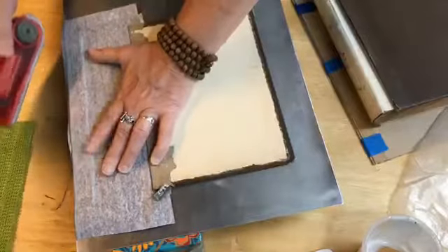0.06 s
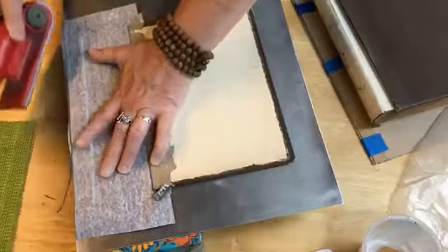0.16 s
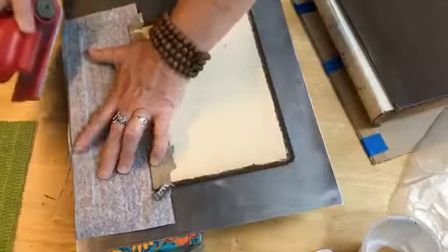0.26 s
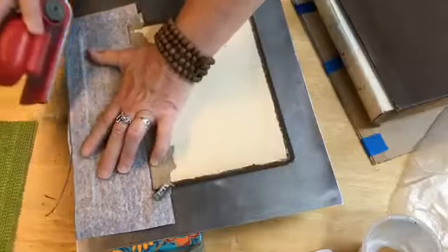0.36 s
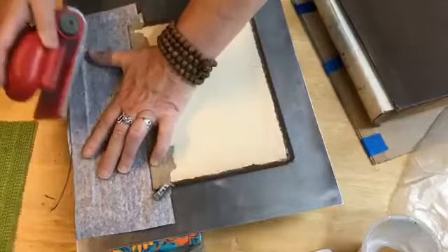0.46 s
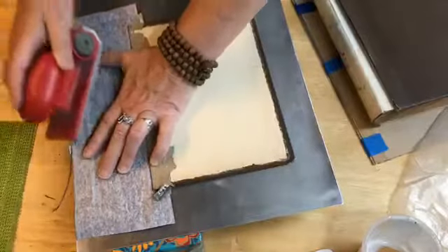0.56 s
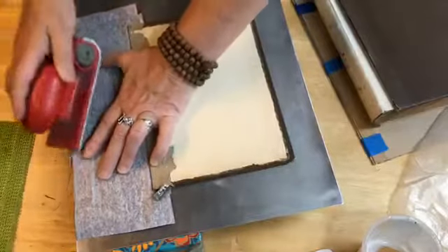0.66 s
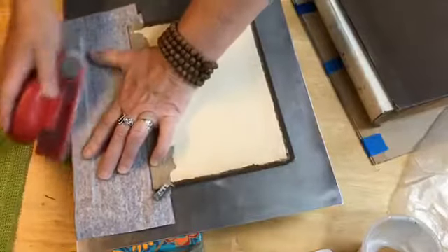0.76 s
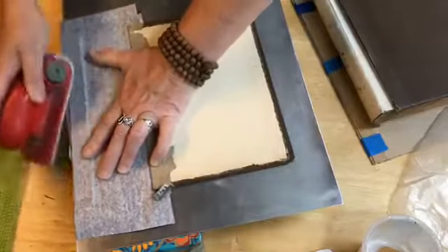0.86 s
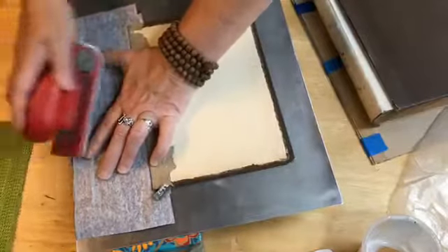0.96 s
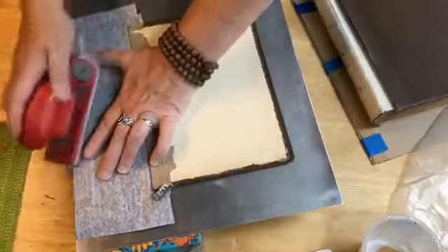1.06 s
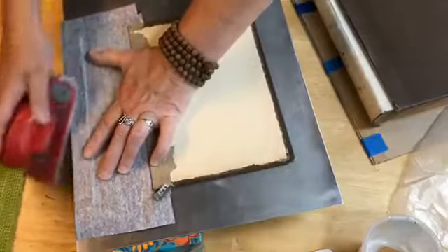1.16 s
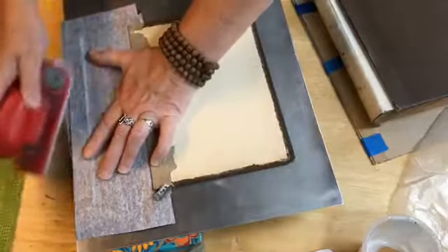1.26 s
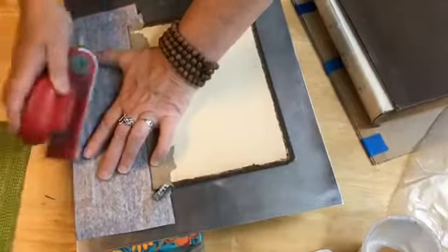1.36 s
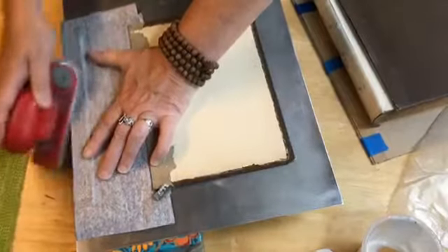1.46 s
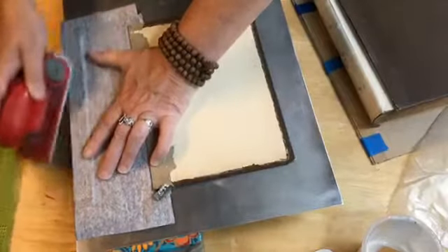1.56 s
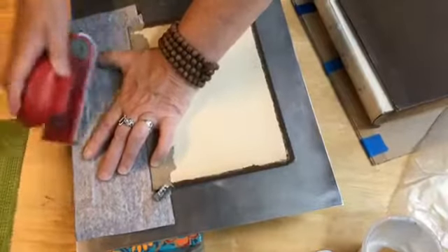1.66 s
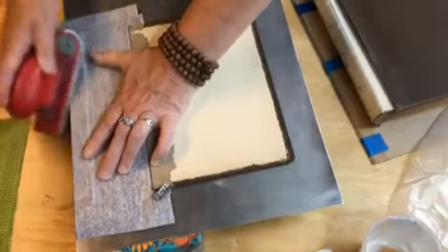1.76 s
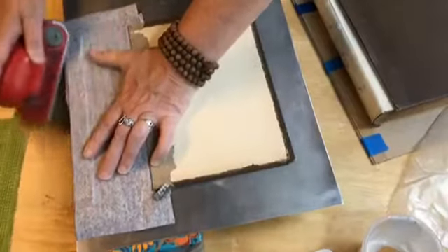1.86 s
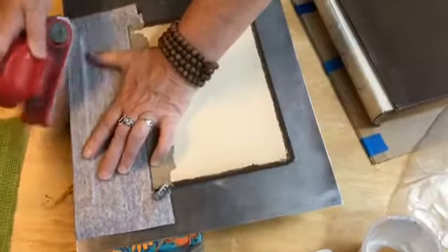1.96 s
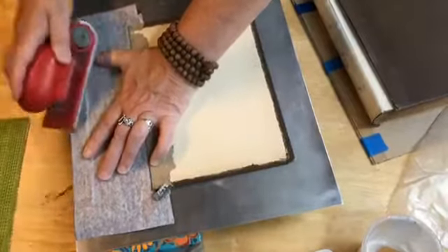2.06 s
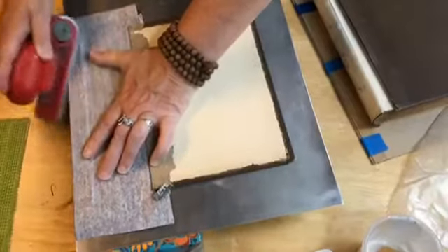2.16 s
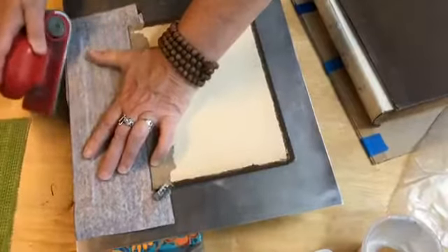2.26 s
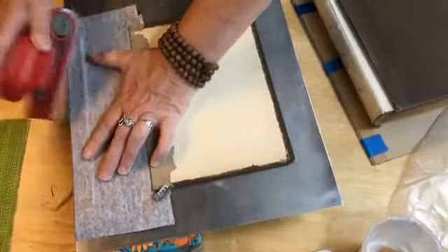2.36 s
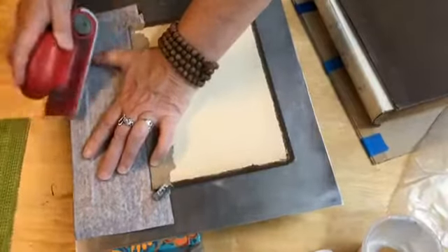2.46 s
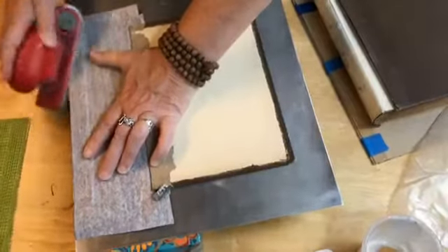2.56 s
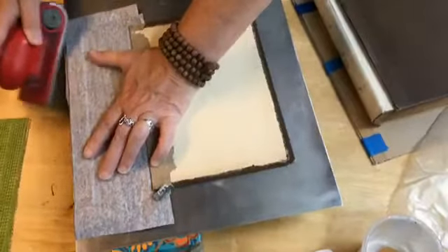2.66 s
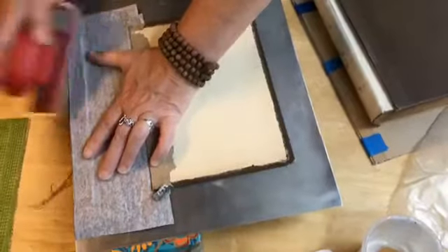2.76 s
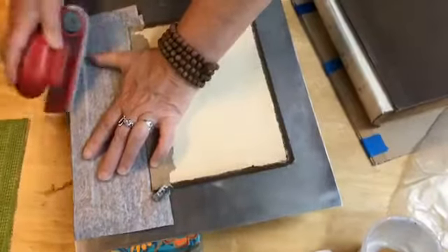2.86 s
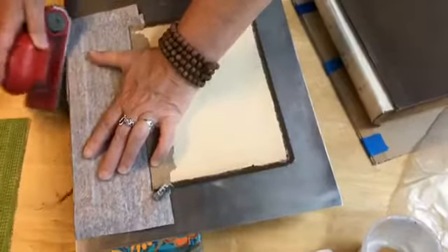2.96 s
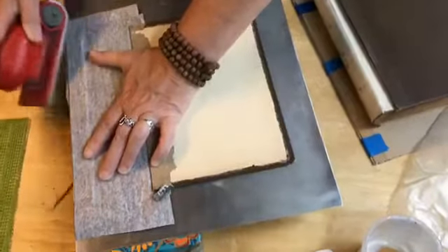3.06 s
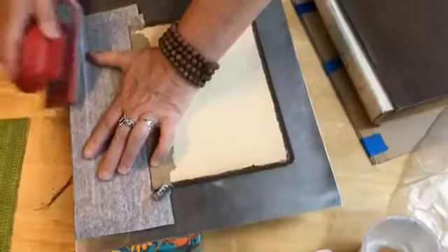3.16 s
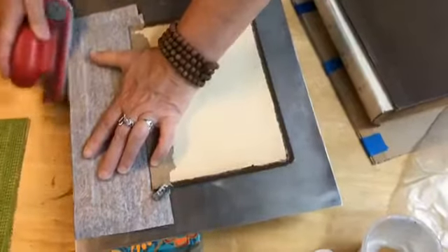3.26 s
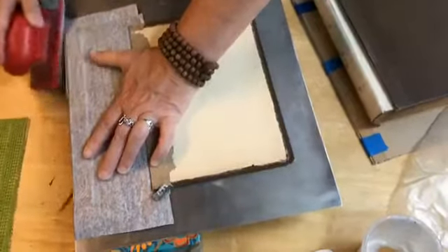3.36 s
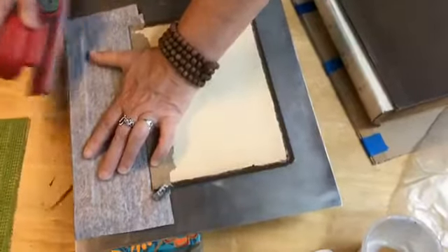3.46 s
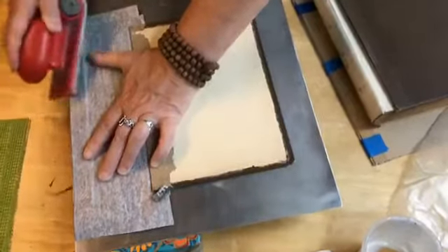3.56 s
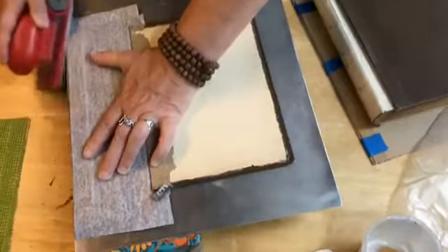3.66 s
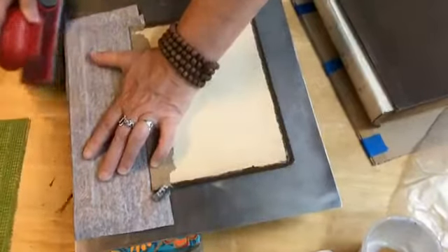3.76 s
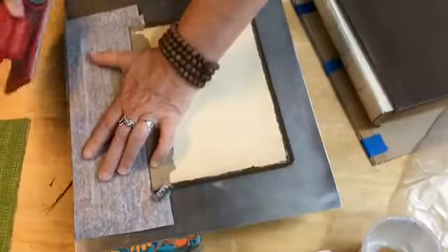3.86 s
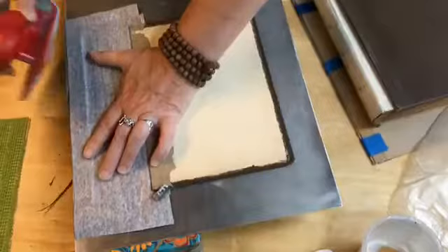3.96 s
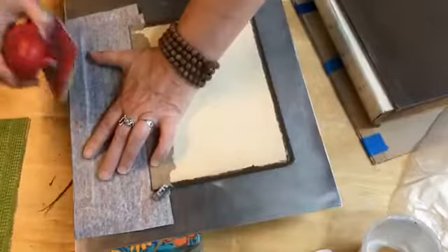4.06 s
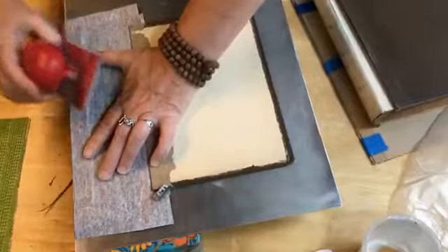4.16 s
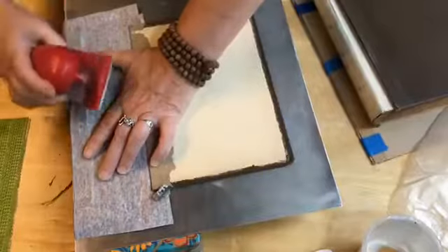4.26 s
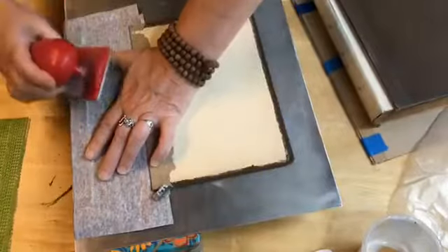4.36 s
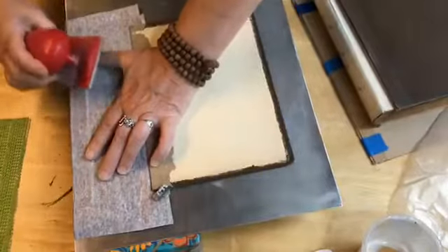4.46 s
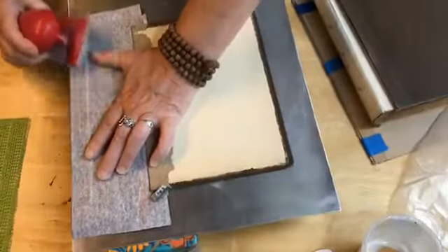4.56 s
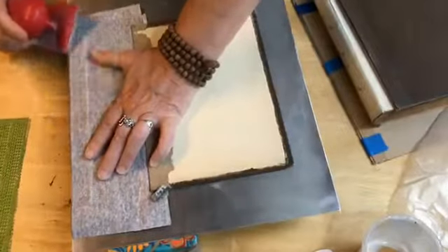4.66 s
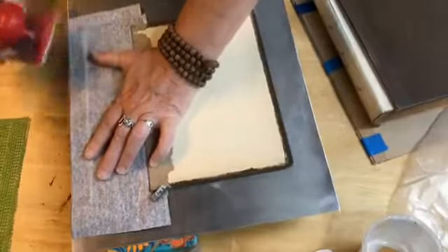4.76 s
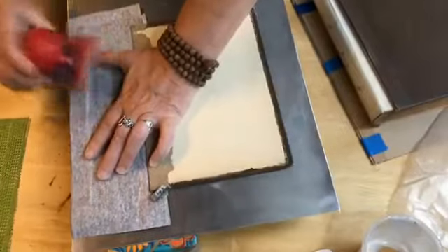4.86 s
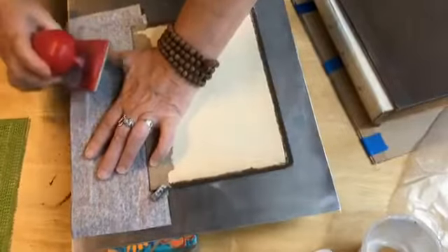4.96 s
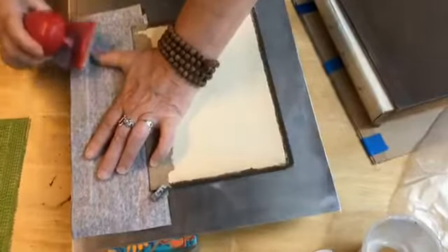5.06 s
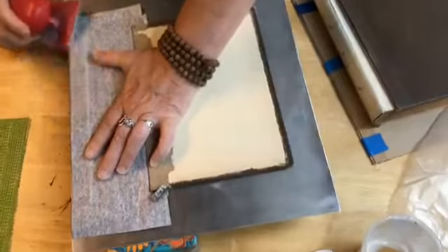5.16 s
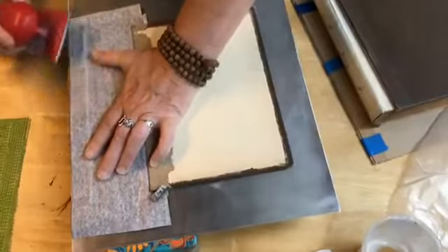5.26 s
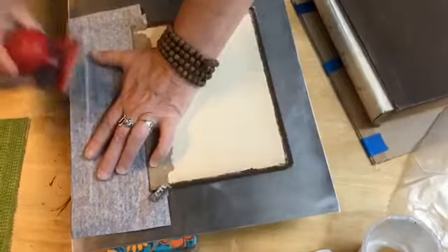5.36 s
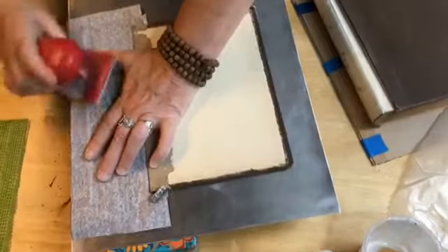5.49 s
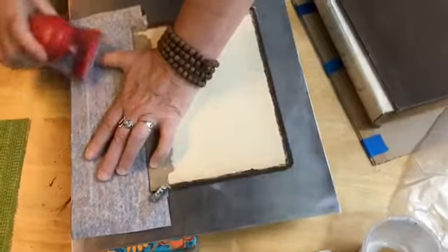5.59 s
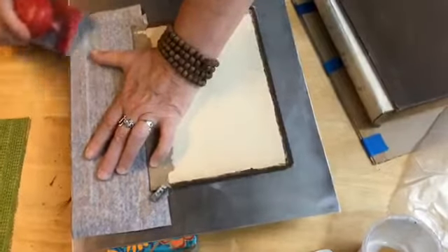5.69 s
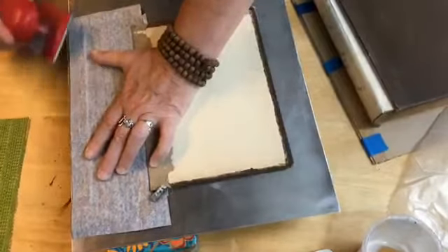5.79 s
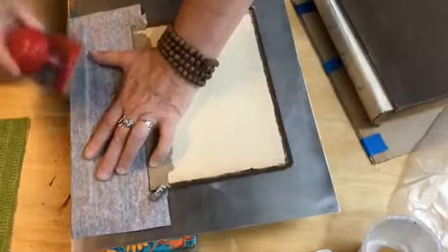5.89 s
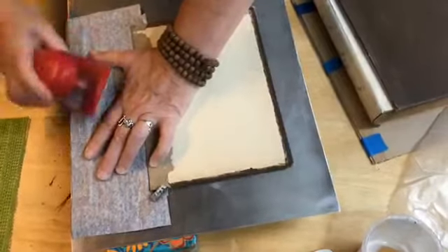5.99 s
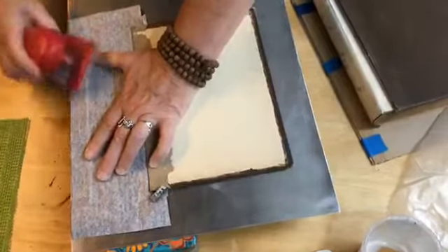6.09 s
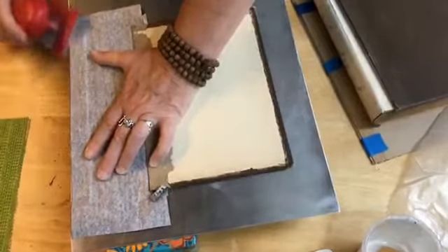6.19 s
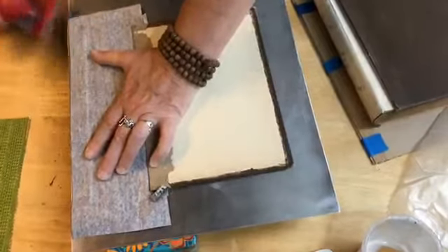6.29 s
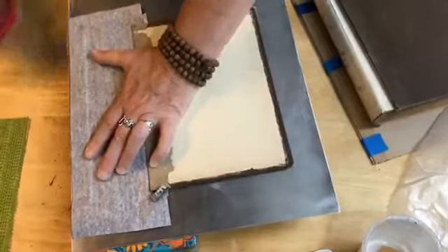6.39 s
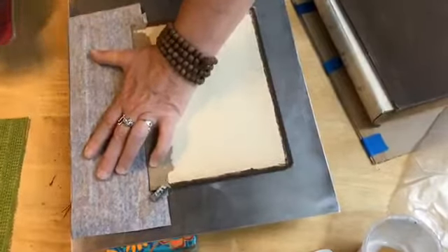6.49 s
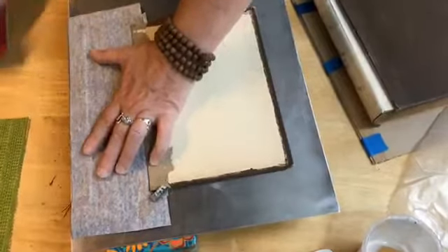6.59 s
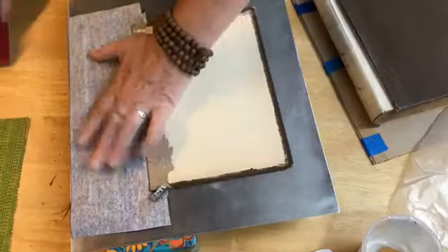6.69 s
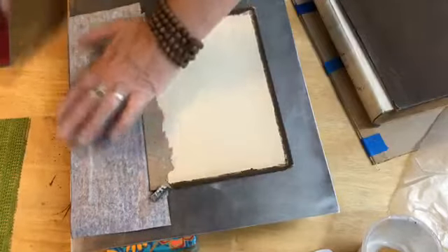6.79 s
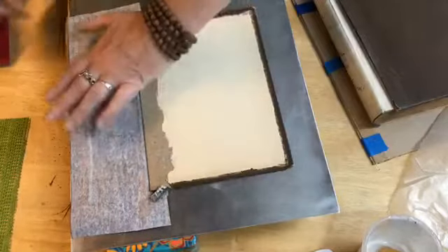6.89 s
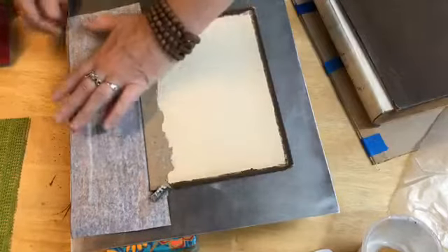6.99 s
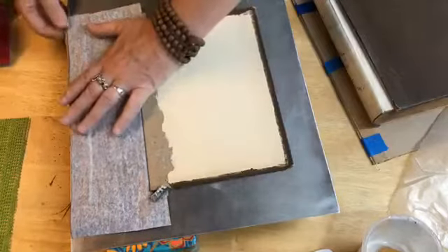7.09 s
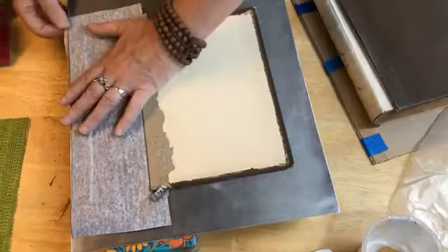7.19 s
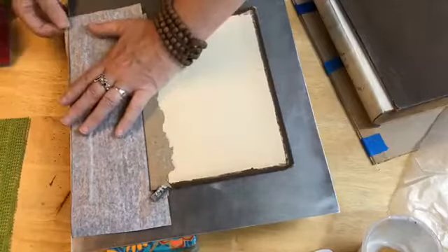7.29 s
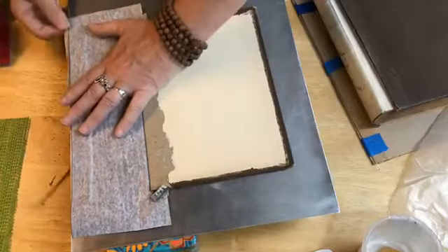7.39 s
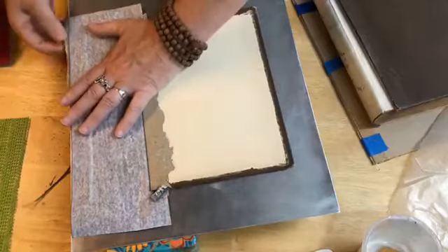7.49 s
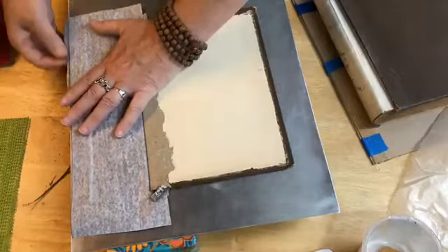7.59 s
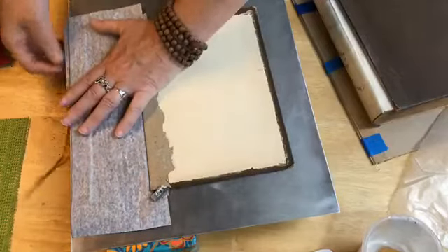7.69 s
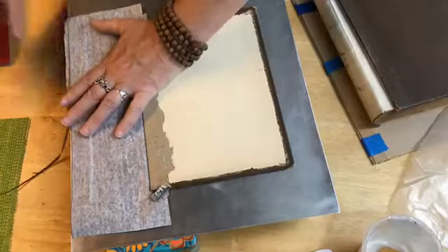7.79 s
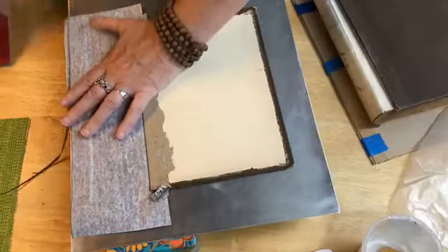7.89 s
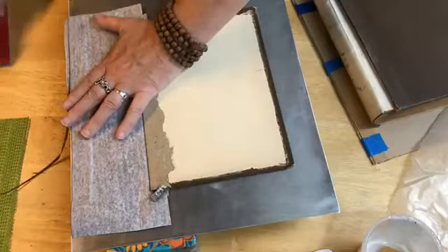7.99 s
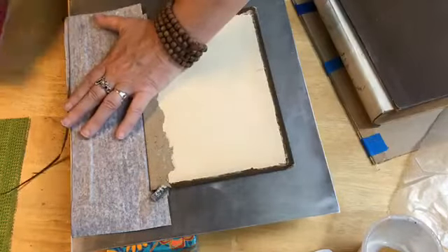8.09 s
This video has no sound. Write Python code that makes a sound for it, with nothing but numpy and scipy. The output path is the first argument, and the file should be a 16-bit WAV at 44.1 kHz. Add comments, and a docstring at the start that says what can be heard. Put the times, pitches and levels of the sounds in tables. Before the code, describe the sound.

A gritty sanding block rasps in thirteen short separate strokes over a board edge, with hollow woody knocks and faint paper rustles afterward.

```python
"""A rubber sanding block works the edge of a paper-covered board on a workbench, heard close; both channels are equal.
First come a light slide, a paper tick and a dull thud. Then 13 strokes of clumped grit grains, filtered by block and
board: three full-face, six flat on the edge, four tilted, with noise scuffs and cracks, struck board and bench modes.
Filtered-noise slides and ticks and dull modal thuds appear between strokes too, and a last few follow with a faint
knock. A short room tail and a steady coloured hush lie under it all."""
import sys
import numpy as np
from scipy import signal
from scipy.fft import rfft, irfft, next_fast_len
from scipy.io import wavfile

SR = 44100
rng = np.random.default_rng(int(sys.argv[2]) if len(sys.argv) > 2 else 0)


def int16_out(signal):
    """Quantize to a 16-bit WAV file."""
    q = np.round(np.clip(np.atleast_2d(signal).T, -1, 1) * 32767)
    wavfile.write(sys.argv[1], SR, q.astype(np.int16))


N = 358974
TIME_S = np.arange(N) / SR
FREQS_HZ = np.maximum(np.fft.rfftfreq(N, 1 / SR), 1)

# Event and mode levels below are relative: each layer adds its own level_db.
# strokes: land_s, grip, full_speed_after_s, run_off_after_s, full_speed_db, run_off_db, fade_db_per_s,
# hollow_re_rasp_db, hiss_re_rasp_db, hiss_gain_along_stroke_db, landing_scuff_db
STROKES = [(0.618, "full", 0.09, 0.18, -42, -33.5, 278, 0, -13.5, 10.5, -35),
           (0.9935, "full", 0.11, 0.18, -33.5, -29.5, 355.5, 1, -11, 14.5, -36),
           (1.374, "full", 0.018, 0.14, -34, -27, 352, -2.5, -7.5, 3.5, -24),
           (1.6904, "flat", 0.044, 0.15, -35.5, -37, 324, -5, -4, 6, -26.5),
           (2.055, "flat", 0.046, 0.15, -40, -34, 335, -4, -5.5, 10, -26),
           (2.433, "flat", 0.041, 0.19, -44, -36.5, 343, -5.5, -6.5, 10, -27),
           (2.8263, "flat", 0.066, 0.11, -37, -30.5, 309, -3, -7, 8.5, -24),
           (3.2021, "flat", 0.045, 0.11, -35.5, -37.5, 256, -6, -5, 4.5, -25.5),
           (3.542, "flat", 0.11, 0.13, -35.5, -31.5, 285, -7, -4.5, 6, -25.5),
           (4.2393, "tilted", 0.14, 0.42, -40.3, -39.3, 325, -7.3, -8.6, 11, -40),
           (4.9206, "tilted", 0.073, 0.28, -41.5, -41, 420, -7.5, -5, 11, -33.5),
           (5.4585, "tilted", 0.058, 0.31, -38.5, -45, 330, -9.5, -3, 5, -32),
           (6.0017, "tilted", 0.073, 0.25, -34.5, -42, 364, -10.5, -3.5, 5, -40.5)]
# rasp colour per grip: freq_hz, density_db
FULL_COLOUR = [(120, -24), (260, -17.5), (420, -11), (600, -9), (740, -8), (880, 4.5), (1900, -3),
               (3000, -1.5), (4800, -2), (7000, -5), (10000, -8), (14000, -11.5), (16000, -18)]
FLAT_COLOUR = [(120, -3), (260, -14.5), (420, -9), (740, -2), (1050, -1.5), (1900, -3.5), (3000, -1),
               (4800, -2.5), (7000, -5), (10000, -8), (14000, -12.5), (16000, -19)]
TILTED_COLOUR = [(120, -10.5), (260, -10), (420, -2), (850, -0.5), (1300, 1.5), (1900, -2.5), (2700, 0),
                 (4800, -3), (7000, -7), (10000, -12), (14000, -14.5), (16000, -20.5)]
# block and board resonances per grip: centre_hz, width_hz, lift_db
FULL_PEAKS = [(350, 63, 7.1), (462, 34, 13), (468, 24, 11), (643, 14, 13.3), (815, 43, 4.2),
              (965, 150, 5.4), (1070, 60, 3.3), (1245, 76, 10.5), (1396, 72, 6.1), (1740, 60, 4),
              (2125, 46, 4), (2560, 75, 3), (3690, 220, 5.5), (4090, 240, 3.3), (5000, 60, 3),
              (5450, 58, 3)]
FLAT_PEAKS = [(350, 84, 10), (462, 33, 14.5), (490, 30, 8.5), (638, 14, 11.5), (950, 51, 4.5),
              (1246, 63, 8.5), (1447, 88, 6), (1527, 70, 0.5), (1887, 41, 1), (2125, 50, 4), (2360, 59, 4),
              (2750, 80, 2.5), (3790, 410, 4), (4350, 110, 4.5), (5500, 58, 2.5), (6130, 460, 2.5)]
TILTED_PEAKS = [(326, 39, 4.6), (481.5, 19.5, 7.6), (634, 21, 6.5), (1244, 94, 4.1), (1484, 180, 6.7),
                (2130, 120, 3.9), (2374, 90, 6.4), (3025, 110, 4), (3820, 56, 2.9), (5100, 21, 1.4)]
SWELL_DB = 51.5   # depth of the swell up to full speed
RUN_OFF_S = 0.015   # rounding of the run-off
HOLLOW_LOSS_DB = 6   # over a stroke, as the contact point travels along the edge
HISS_LOSS_DB_PER_DB = 0.22   # extra hiss loss per dB that the rasp loses to slow speed or run-off
# block corner catching on the edge: peak_s, level_db, pitch_hz, half_length_s
CATCHES = [(0.85, -42.5, 2800, 0.0079), (1.459, -36, 3670, .015), (4.63, -44.5, 2970, 0.035),
           (5.151, -39.5, 2850, 0.02)]
# block or hand knocks on the board: start_s, thump_db, hollow_ring_db, clack_db, dry_crack_db, bench_sway_db
KNOCKS = [(0.625, -42.5, -28, -45, -38.5, -45.5), (1.0, -45, -32.5, -53, -42, -46),
          (1.38, -36.5, -53.5, -41, -28.5, -40), (1.696, -38, -51, -44, -36.5, -39.5),
          (2.061, -37, -25, -41.5, -33.5, -45.5), (2.213, -42, -63, -49, -44, -41),
          (2.442, -33, -18, -32, -30.5, -43), (2.631, -45.5, -65, -53, -55, -42.5),
          (2.831, -35.5, -18.5, -30.5, -31.5, -42), (2.947, -35.5, -43, -41.5, -31, -38.5),
          (3.21, -39.5, -16.5, -34.5, -46, -43), (3.297, -34.5, -24, -39, -31.5, -42.5),
          (3.547, -36.5, -29, -28, -36, -39.5), (3.555, -42, -24.5, -29.5, -32, -53),
          (3.681, -37, -46, -37.5, -37.5, -41), (4.244, -59.5, -42.5, -53, -47, -52),
          (4.925, -37, -21.5, -34, -37.5, -38.5), (5.463, -38.5, -19.5, -36.5, -37.5, -37),
          (6.007, -47, -32.5, -50, -47.5, -52), (6.686, -47, -56, -72, -42.5, -51),
          (7.999, -52.5, -49, -60, -58.5, -60)]
# board modes: pitch_hz, level_db, t60_s
BOARD_MODES = [(159, -15.5, 0.28), (186.3, -9.5, 0.22), (238, 0.5, 0.083), (296, 0.5, 0.046),
               (323.2, -3.5, 0.13), (370, 4, 0.049), (466.4, -0.5, 0.042), (526, -16.5, 0.14),
               (600, -2, 0.015), (638, -1, 0.11), (700, -6, 0.025), (760.5, -9.5, 0.14),
               (964, -27.5, 0.059)]
# colour of the dry crack: freq_hz, density_db
CRACK_COLOUR = [(700, -1.5), (1000, 2.5), (1400, -1.5), (2000, -2.5), (2800, -6.5), (4500, -34.5),
                (16000, -40.5)]
# low bench modes swayed by knocks and run-offs: pitch_hz, level_db, t60_s
SWAY_MODES = [(45.7, -7.5, 0.47), (61.9, 8, 0.12), (74, -1.5, 0.17), (104, -5.5, 0.11)]
SWAY_LAG_S, RUN_OFF_SWAY_DB = 0.0342, -53.5
# dull thuds in the bench: start_s, push_db
THUDS = [(0.433, -35.5), (4.879, -42.5), (5.749, -33.5), (6.599, -32), (7.488, -33)]
# bench modes of the thuds: pitch_hz, level_db, t60_s
THUD_MODES = [(80.5, -2.5, 0.25), (142, -3.5, 0.14), (215, -14, 0.15)]
# hand or block sliding lightly on the paper: peak_s, level_db, swell_s, fade_s, treble_db
SLIDES = [(0.075, -69.5, 0.042, 0.29, -2), (0.405, -69.5, 0.066, 0.024, 7), (3.83, -71, 0.0073, 0.056, -12),
          (4.04, -69, 0.038, 0.037, -5), (4.8, -67, 0.022, 0.064, -10.5), (5.83, -70, 0.0056, 0.015, -18),
          (6.62, -72, 0.18, 0.18, -2), (7.159, -64, 0.045, 0.016, -6), (7.635, -70.5, 0.032, 0.045, 4.5),
          (7.83, -69, 0.038, 0.046, 1), (8.02, -65, 0.087, 0.088, -0.5)]
# small paper ticks and scrapes: start_s, level_db, t60_s, brightest_hz
TICKS = [(0.248, -51, 0.04, 4330), (2.802, -51.5, 0.08, 1000), (3.876, -49.5, 0.024, 3500),
         (3.895, -51, 0.051, 3500), (3.924, -43.5, 0.013, 3960), (6.409, -47.5, 0.014, 4140),
         (6.681, -44.5, 0.17, 2500), (7.445, -56.5, 0.16, 4800), (8.048, -47.5, 0.17, 2740)]
# paper colour: freq_hz, density_db
PAPER_COLOUR = [(200, -15.5), (600, 1.5), (1500, -1), (3000, -3), (6000, -1.5), (10000, -3), (16000, -11)]
# paper resonances: centre_hz, width_hz, lift_db
PAPER_PEAKS = [(2330, 260, 2), (3670, 550, 3)]
ROOM_T60_S, ROOM_DB = 0.23, -18
# colour of the still room: freq_hz, density_db
HUSH_COLOUR = [(12, -33), (20, -1), (60, 0.5), (104, -4.5), (154, -11.5), (607, -20.5), (897, -27),
               (1000, -21.5), (1120, -27), (1480, -26), (5850, -32.5), (13200, -40), (16000, -41.5)]
HUSH_DB = -64
CUTOFF_HZ = 16000


def rasp(strokes, colour, peaks, level_db, catch_db):
    """Grit tears along the edge, exciting block and board; hollow middle and fine hiss shift along each stroke."""
    gain, hollow_db, hiss_db = stroke_controls(strokes)
    grit = grains(per_s=10000, spread_db=2.5, catch_db=catch_db, catch_hz=140)
    tearing = many_modes(coloured(grit, colour), ripple_db=2.2, spacing_hz=45)

    # the travelling contact point feeds each resonance now more, now less
    full_band = tearing
    for hz, width_hz, lift_db in peaks:
        feed = from_db(3.2 * drift(7))
        full_band = full_band + (from_db(lift_db) - 1) * feed * resonance(tearing, hz, width_hz)
    full_band = full_band / rms(band(full_band, 2000, 7000))

    # take out middle and top, put them back at their moving levels
    spectrum = rfft(full_band)
    middle = irfft(spectrum / (1 + np.log2(FREQS_HZ / 1150) ** 4 * 8), N)
    top = irfft(spectrum / (1 + (7000 / FREQS_HZ) ** 6), N)
    hollow = middle / rms(middle) * from_db(hollow_db - 1.5)
    hiss = top / rms(top) * from_db(hiss_db + 0.23)
    return from_db(level_db) * gain * (full_band - middle - top + hollow + hiss)


def stroke_controls(strokes):
    """Each stroke swells to full speed, leans in or eases off, and fades past the edge, thinning and brightening."""
    gain, hollow_db, hiss_db = np.zeros((3, N))
    for (start_s, _, full_s, off_s, full_db, off_db, fade_db_per_s,
         mid_hollow_db, mid_hiss_db, brightening_db, _) in strokes:
        first = int(start_s * SR)
        age_s = TIME_S[:N - first][:SR]
        span = slice(first, first + len(age_s))

        swell_loss_db = SWELL_DB * np.maximum(1 - age_s / full_s, 0) ** 2
        fade_loss_db = fade_db_per_s * RUN_OFF_S * np.logaddexp(0, (age_s - off_s) / RUN_OFF_S)
        loss_db = swell_loss_db + fade_loss_db
        pressure_db = np.interp(age_s, [full_s, off_s], [full_db, off_db])
        travel = np.minimum(age_s / off_s, 1) - 0.5

        gain[span] = from_db(pressure_db - loss_db)
        hollow_db[span] = mid_hollow_db - HOLLOW_LOSS_DB * travel
        hiss_db[span] = mid_hiss_db + brightening_db * travel - HISS_LOSS_DB_PER_DB * loss_db
    return gain, hollow_db, hiss_db


def grains(per_s, spread_db, catch_db, catch_hz):
    """Tiny fractures of uneven size, in clumps as the surface catches and lets go."""
    sizes = from_db(spread_db * np.minimum(rng.exponential(1, N), 4))
    signs = rng.choice([-1, 1], N)
    fires = rng.random(N) < per_s / SR
    return sizes * signs * fires * from_db(catch_db * drift(catch_hz))


def many_modes(x, ripple_db, spacing_hz):
    """Crowded upper modes of the board make a fine, fixed ripple in the spectrum."""
    centres_hz = np.arange(0, SR / 2, spacing_hz)
    ripple = np.interp(FREQS_HZ, centres_hz, rng.standard_normal(len(centres_hz)))
    upper = FREQS_HZ / (FREQS_HZ + 1000)
    return irfft(rfft(x) * from_db(ripple_db * ripple * upper), N)


def contact(lift_s, settle_s):
    """Gain of the touch: the block is off the board before each landing and settles on it just after."""
    touch = np.ones(N)
    for start_s, *_ in STROKES:
        touch *= np.interp(TIME_S - start_s, [-2 * lift_s, -lift_s, 0, settle_s], [1, 0, 0, 1])
    return touch


def catches(level_db, width_hz):
    """A dragging corner: friction drives one narrow resonance, which sings for a moment."""
    out, friction = np.zeros(N), rng.standard_normal(N)
    for peak_s, db, hz, half_s in CATCHES:
        tone = resonance(resonance(friction, hz, width_hz), hz, width_hz)
        out += from_db(db) * tone / rms(tone) * swell(peak_s, half_s, half_s)
    return from_db(level_db) * out


def scuffs(level_db, rise_s, t60_s):
    """The grit bites for an instant as the block lands: a burst of coloured grains."""
    envelope = sum(from_db(db) * burst(start_s, rise_s, t60_s) for start_s, *_, db in STROKES)
    bite = grains(per_s=6900, spread_db=3.0, catch_db=0.0, catch_hz=215)
    return from_db(level_db) * envelope * coloured(bite, FLAT_COLOUR[2:], FLAT_PEAKS)


def knocks(level_db, build_s, detune):
    """The board rings briefly; where it is hit and held sets the share and exact pitch of its modes."""
    blows = []
    for start_s, *shares_db, _, _ in KNOCKS:
        for hz, mode_db, t60_s in BOARD_MODES:
            # thump to 400 Hz, hollow ring to 570 Hz, clack above
            share_db = shares_db[np.searchsorted([400, 570], hz)]
            late_s = rng.uniform(0, 0.0034)   # the soft pad does not land all at once
            pitch_hz = hz * (1 + detune * rng.standard_normal())
            blows.append((start_s + late_s, share_db + mode_db, pitch_hz, t60_s))
    return from_db(level_db) * strike(blows, build_s)


def cracks(level_db, rise_s, t60_s):
    """The board slaps the bench under each knock: a dry, woody burst of grains."""
    envelope = sum(from_db(db) * burst(start_s, rise_s, t60_s) for start_s, *_, db, _ in KNOCKS)
    slap = grains(per_s=5000, spread_db=3.0, catch_db=1.5, catch_hz=200)
    return from_db(level_db) * envelope * coloured(slap, CRACK_COLOUR, FLAT_PEAKS)


def sways():
    """Pushes on the bench just after each knock and each run-off: rows of start_s, push_db."""
    knocked = [(start_s + SWAY_LAG_S, sway_db) for start_s, *_, sway_db in KNOCKS]
    released = [(start_s + off_s + SWAY_LAG_S, RUN_OFF_SWAY_DB) for start_s, _, _, off_s, *_ in STROKES]
    return knocked + released


def bench(pushes, modes, level_db, build_s):
    """Soft pushes set the low modes of the bench swinging."""
    blows = [(start_s, push_db + mode_db, hz, t60_s)
             for start_s, push_db in pushes for hz, mode_db, t60_s in modes]
    return from_db(level_db) * strike(blows, build_s)


def paper_slides(level_db):
    """Hand or block slides over paper: friction grains swell and fade, each slide with its own treble."""
    friction = coloured(grains(per_s=4000, spread_db=3, catch_db=2, catch_hz=40), PAPER_COLOUR, PAPER_PEAKS)
    treble = irfft(rfft(friction) / (1 + (6000 / FREQS_HZ) ** 4), N)
    out = np.zeros(N)
    for peak_s, db, rise_s, fall_s, treble_db in SLIDES:
        tinted = friction + (from_db(treble_db) - 1) * treble
        out += from_db(db) * swell(peak_s, rise_s, fall_s) * tinted
    return from_db(level_db) * out


def paper_ticks(level_db, focus_db, ring_db, ring_t60_s):
    """Paper snaps as noise bursts focused at their own pitch, each with a ring in the lowest paper resonance."""
    crinkle, out = coloured(rng.standard_normal(N), PAPER_COLOUR), np.zeros(N)
    ring_hz, ring_width_hz, _ = PAPER_PEAKS[0]
    ringing = from_db(ring_db) * resonance(crinkle, ring_hz, ring_width_hz)
    for start_s, db, t60_s, hz in TICKS:
        snap = crinkle + from_db(focus_db) * resonance(crinkle, hz, 0.43 * hz)
        tick = burst(start_s, 0.0008, t60_s) * snap
        after = burst(start_s, 0.0011, ring_t60_s) * ringing
        out += from_db(db) * (tick + after)
    return from_db(level_db) * out


def room(x):
    """Short, slightly dull tail from the walls of a small workshop: decaying noise of unit energy."""
    tail = band(rng.standard_normal(N), 110, 3900) * burst(0.0033, 0.0016, ROOM_T60_S)
    return signal.fftconvolve(x, tail[:SR] / np.sqrt(np.sum(tail ** 2)))[:N]


def hush():
    """Still room: steady coloured noise."""
    return from_db(HUSH_DB) * coloured(rng.standard_normal(N), HUSH_COLOUR)


def strike(blows, build_s):
    """Sum of struck modes given as rows of start_s, level_db, pitch_hz, t60_s."""
    out = np.zeros(N)
    for start_s, db, hz, t60_s in blows:
        span, swing = ring(start_s, hz, t60_s, build_s)
        out[span] += from_db(db) * swing
    return out


def ring(start_s, hz, t60_s, build_s):
    """One decaying mode whose swing builds up during contact; returns its span and samples."""
    first = int(start_s * SR)
    age_s = np.arange(min(int(1.5 * t60_s * SR), N - first)) / SR
    decay = np.exp(-np.log(1000) * age_s / t60_s)
    build = 1 - np.exp(-np.log(1000) * age_s / build_s)
    return slice(first, first + len(age_s)), decay * build * np.sin(2 * np.pi * hz * age_s)


def burst(start_s, rise_s, t60_s):
    """Envelope that rises briefly and dies away."""
    age_s = np.maximum(TIME_S - start_s, 0)
    decay = np.log(1000) * np.maximum(age_s - rise_s, 0) / t60_s
    return np.minimum(age_s / rise_s, 1) * np.exp(-np.minimum(decay, 20))


def swell(peak_s, rise_s, fall_s):
    """Rounded envelope, highest at peak_s."""
    width_s = np.where(TIME_S < peak_s, rise_s, fall_s)
    return np.exp(-np.minimum(((TIME_S - peak_s) / width_s) ** 2, 20))


def drift(rate_hz):
    """Slow chance with rms 1, drawn at every 20th sample."""
    white = rng.standard_normal(next_fast_len(N // 20 + 2))
    hz = np.fft.rfftfreq(len(white), 20 / SR)
    slow = irfft(rfft(white) / (1 + (hz / rate_hz) ** 2), len(white))
    return np.interp(np.arange(N) / 20, np.arange(len(slow)), slow / rms(slow))


def coloured(x, colour, peaks=()):
    """Shape x by a broad colour with resonances standing out of it; rms 1."""
    hz, db = np.transpose(colour)
    db = np.interp(np.log(FREQS_HZ), np.log(hz), db)
    for centre_hz, width_hz, lift_db in peaks:
        db = db + lift_db / (1 + (2 * (FREQS_HZ - centre_hz) / width_hz) ** 2)
    low_cut = np.sqrt(1 + (hz[0] / FREQS_HZ) ** 4)   # steep fall below the first point
    y = irfft(rfft(x) * from_db(db) / low_cut, N)
    return y / rms(y)


def resonance(x, hz, width_hz):
    """Two-pole resonance with gain 1 at its centre."""
    r = np.exp(-np.pi * width_hz / SR)
    zeros = np.array([1, 0, -1]) * (1 - r * r) / 2
    poles = [1, -2 * r * np.cos(2 * np.pi * hz / SR), r * r]
    return signal.lfilter(zeros, poles, x)


def band(x, low_hz, high_hz):
    """Causal band-pass."""
    edges_hz = [low_hz, min(high_hz, SR / 2 - 100)]
    return signal.sosfilt(signal.butter(2, edges_hz, "band", fs=SR, output="sos"), x)


def from_db(db):
    """Decibels to gain."""
    return 10 ** (np.asarray(db) / 20)


def rms(x):
    """Root mean square."""
    return np.sqrt(np.mean(x ** 2) + 1e-20)


def scene():
    """Sanding and handling in the still room, the same in both channels."""
    full, flat, tilted = [[row for row in STROKES if row[1] == grip] for grip in ("full", "flat", "tilted")]
    rasps = rasp(full, FULL_COLOUR, FULL_PEAKS, level_db=-0.5, catch_db=1.0)
    rasps += rasp(flat, FLAT_COLOUR, FLAT_PEAKS, level_db=-0.45, catch_db=-0.6)
    rasps += rasp(tilted, TILTED_COLOUR, TILTED_PEAKS, level_db=-0.76, catch_db=0.5)

    work = rasps * contact(lift_s=0.077, settle_s=0.055)
    work += catches(level_db=-0.5, width_hz=250)
    work += scuffs(level_db=-10.5, rise_s=0.0063, t60_s=0.11)
    work += knocks(level_db=5.0, build_s=0.019, detune=0.013)
    work += cracks(level_db=-2.5, rise_s=0.0054, t60_s=0.1)
    work += bench(sways(), SWAY_MODES, level_db=8.5, build_s=0.098)
    work += bench(THUDS, THUD_MODES, level_db=5, build_s=0.1)
    work += paper_slides(level_db=3.0)
    work += paper_ticks(level_db=-7.5, focus_db=9.0, ring_db=5.0, ring_t60_s=0.14)

    out = work + from_db(ROOM_DB) * room(work) + hush()
    return np.array([out, out])


def record(dry):
    """Steep elliptic low-pass cuts the top."""
    return signal.sosfilt(signal.ellip(12, 0.1, 80, CUTOFF_HZ, fs=SR, output="sos"), dry)


dry = scene()
out = record(dry)
int16_out(out)
```